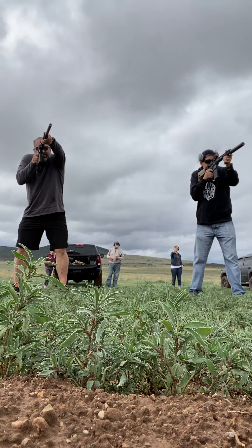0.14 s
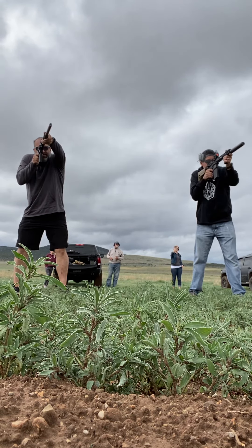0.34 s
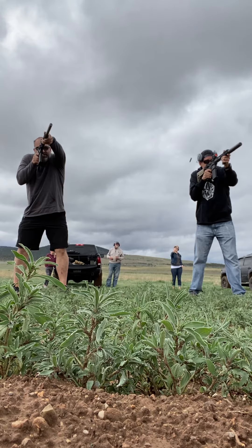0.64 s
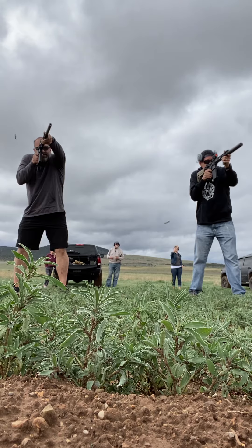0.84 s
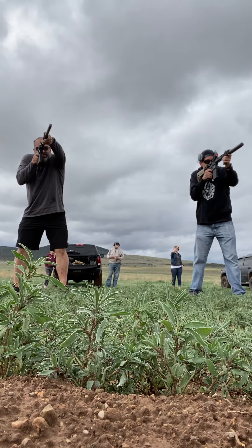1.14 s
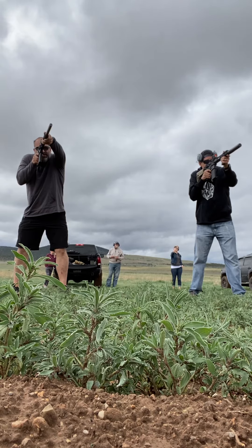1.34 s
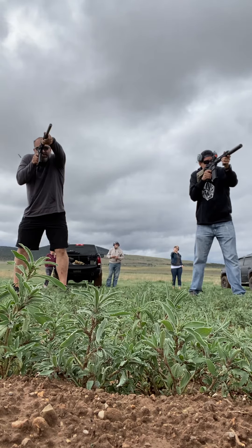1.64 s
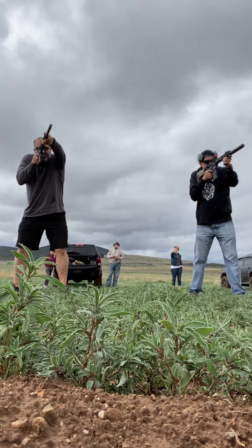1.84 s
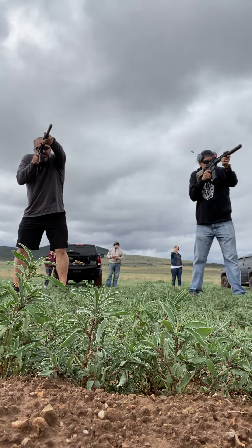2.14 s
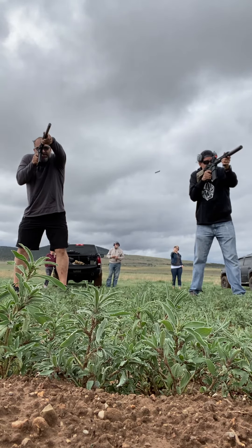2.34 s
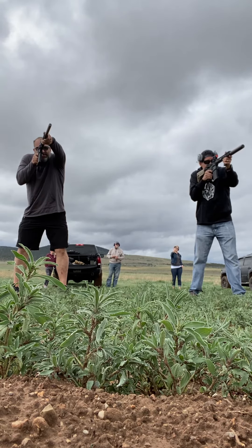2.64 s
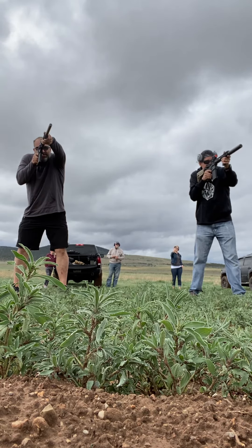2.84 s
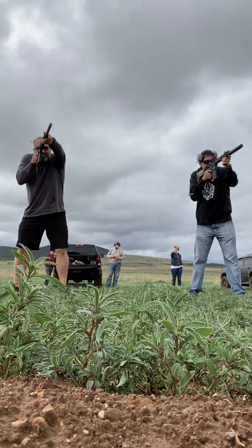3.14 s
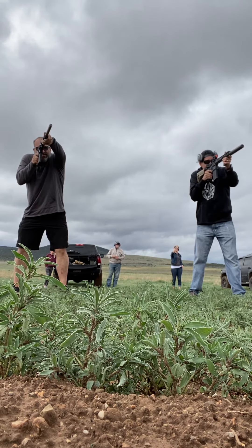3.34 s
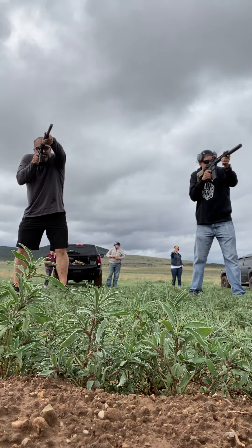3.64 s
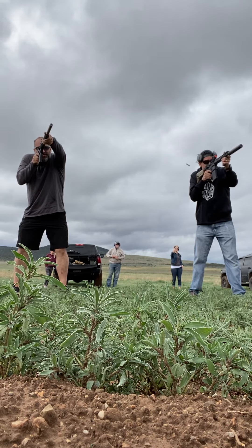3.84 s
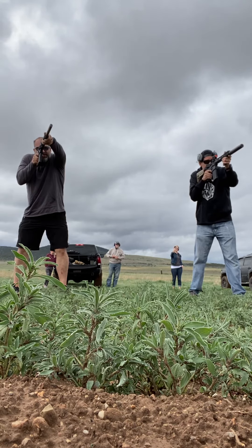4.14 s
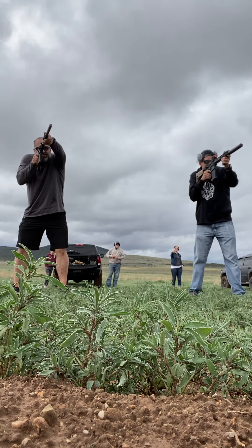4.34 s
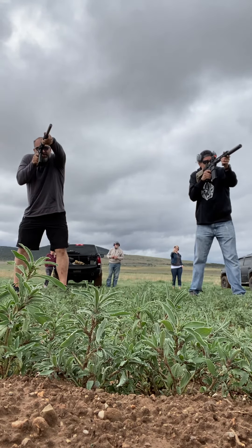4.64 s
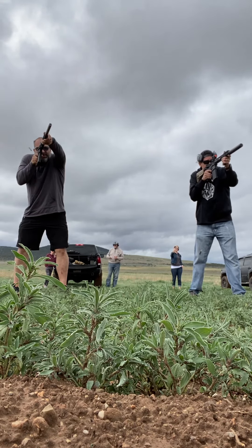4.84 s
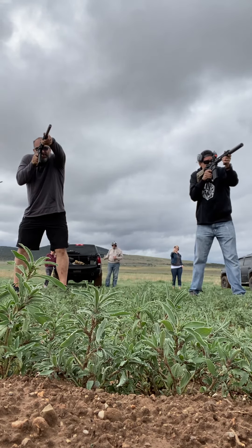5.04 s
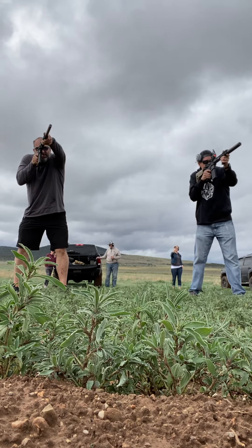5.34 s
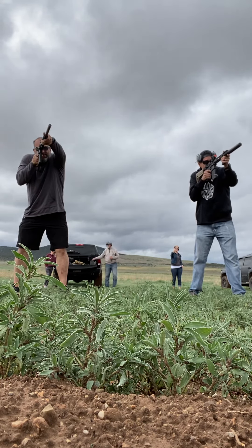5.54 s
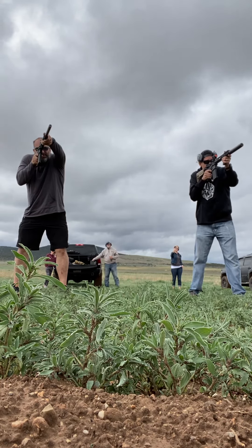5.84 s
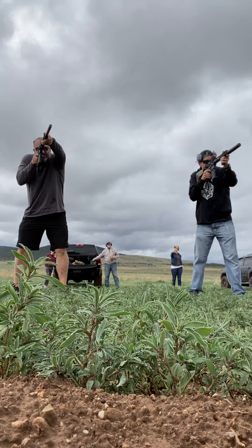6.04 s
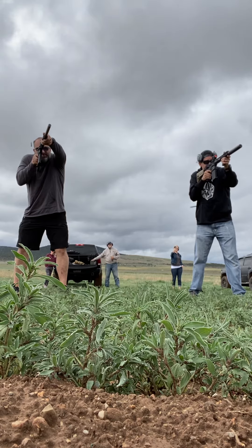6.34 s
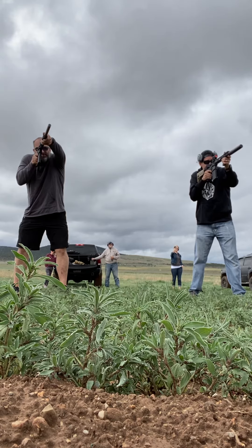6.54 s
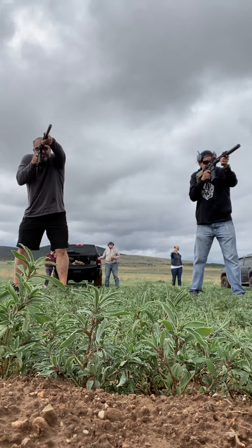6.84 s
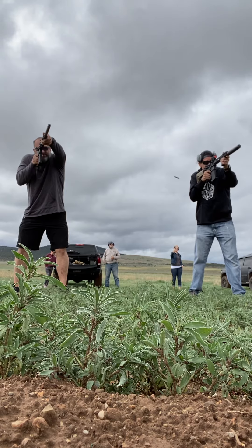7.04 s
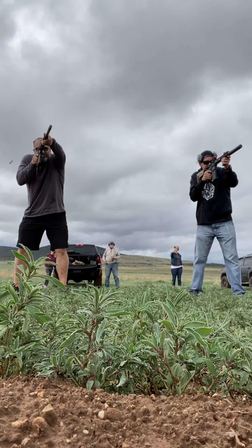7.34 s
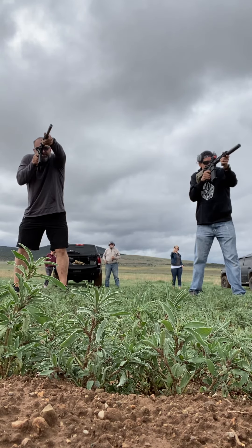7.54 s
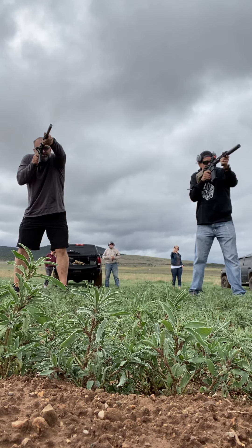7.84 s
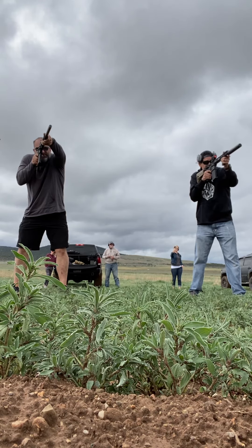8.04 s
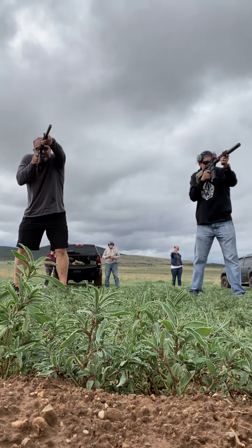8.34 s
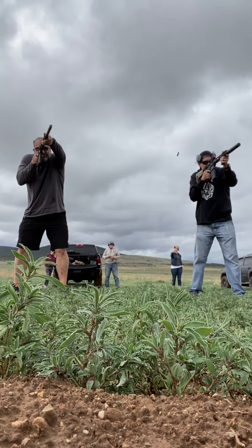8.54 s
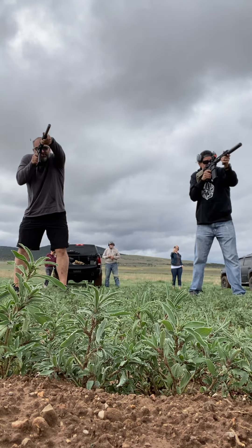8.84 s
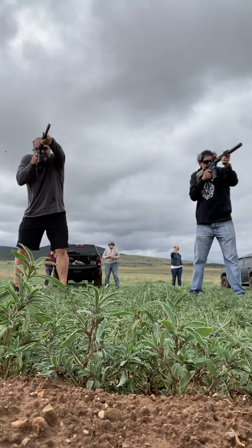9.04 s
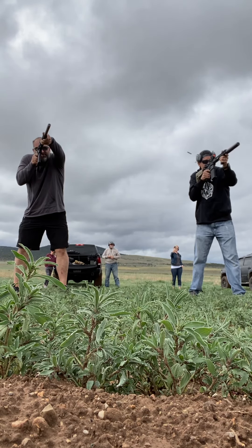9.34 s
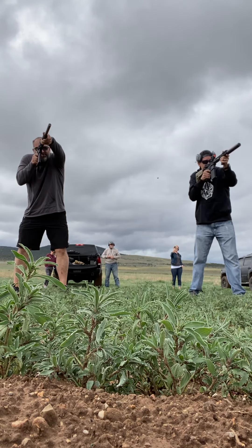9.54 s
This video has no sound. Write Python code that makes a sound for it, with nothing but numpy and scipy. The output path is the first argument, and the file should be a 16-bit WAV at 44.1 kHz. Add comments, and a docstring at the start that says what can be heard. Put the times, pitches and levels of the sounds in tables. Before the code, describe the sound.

A continuous run of about twenty-five suppressed single rifle shots over open ground, close and peak-rounded. The first blast is already sounding at the start. Blasts are dry, puffy and very short, with a low push and rustling scatter from weeds, then a bolt clack. Echoes vary from bright hard slaps to dull, weaker ones. High brass tones shimmer between some shots, and faint wind-like air remains as the last report fades.

```python
"""A short, overloaded blast comes first: two suppressed rifles fire single shots in an open field.
The microphone lies close by among weeds. Each shot is about 15 ms of shaped noise with a low push,
then a bolt clack and low whoops that fall in pitch. Slaps and a wash of scattered echoes follow;
the earliest slaps are the brightest. A roll and thin hiss die away over faint moving air.
Ejected brass cases ring as sums of fading sine tones."""
import sys
import numpy as np
from scipy import signal
from scipy.fft import rfft, irfft, next_fast_len
from scipy.io import wavfile
from scipy.ndimage import map_coordinates

SR = 44100
rng = np.random.default_rng(int(sys.argv[2]) if len(sys.argv) > 2 else 0)


def wrap_up_sound(samples):
    """Save the sound to the file named by the first command line argument, as 16-bit audio."""
    columns = np.atleast_2d(samples).T
    # keep every value between -1 and 1, then stretch to whole-number steps
    tamed = np.clip(columns, -1, 1)
    steps = np.round(tamed * 32767).astype(np.int16)
    wavfile.write(sys.argv[1], SR, steps)


N = 427329

# One row per shot:
# (time [s], body level [dB], body centre [Hz], bolt level [dB], whoop level [dB], far whoop delay [s],
#  first slap delay [s], slap level [dB], wash level [dB], late hiss level [dB])
SHOTS = [(-.054, -17.5, 641, -42, -18.5, 0.18, 0.088, -24.5, -45, -66),
         (.3328, -16.5, 604, -38.5, -20.5, .207, 0.088, -14, -43.5, -72.5),
         (0.7386, -16.5, 800, -44.5, -19, 0.21, 0.087, -20.5, -44, -71.5),
         (1.1703, -18.5, 635, -37, -17.5, 0.21, 0.089, -13, -43.5, -70.5),
         (1.486, -11.5, 637, -43, -17, .188, 0.087, -20, -42, -68),
         (1.9694, -15, 720, -34, -17, .124, 0.096, -36, -57, -74),
         (2.297, -15, 597, -45, -20.5, .168, 0.092, -36, -49.5, -66.5),
         (2.7259, -15.5, 780, -35, -31, 0.14, 0.096, -37, -59, -62.5),
         (3.0593, -16.5, 615, -40.5, -17, 0.15, 0.14, -33.5, -56.5, -58.5),
         (3.5005, -16, 519, -38, -29, 0.18, 0.092, -22, -48.5, -71),
         (3.9063, -16, 762, -43.5, -21, 0.19, 0.088, -16.5, -44.5, -73.5),
         (4.2952, -16.5, 705, -35.5, -15.5, 0.2, 0.09, -8.5, -43, -79),
         (4.764, -13, 810, -43.5, -17, 0.16, .130, -30, -55.5, -67.5),
         (5.1457, -16, 871, -36, -30.5, .102, .150, -39.5, -61, -65),
         (5.5224, -17.5, 698, -46.5, -23.5, 0.19, .0916, -25.5, -44.5, -66.5),
         (5.882, -20, 661, -37.5, -18, .196, 0.088, -10, -41.5, -73),
         (6.2974, -13, 665, -43.5, -18, .166, .0904, -61, -54, -69.5),
         (6.6528, -17, 696, -37.5, -20.5, 0.19, .0888, -14.5, -45, -74),
         (7.0124, -13, 724, -46.5, -19, 0.13, 0.12, -25.5, -55.5, -64),
         (7.4355, -16, 570, -37.5, -42.5, 0.18, .0883, -22.5, -54, -67.5),
         (7.8473, -14.5, 773, -42, -17, 0.16, .130, -34, -56.5, -60),
         (8.2376, -19, 570, -35, -16, 0.15, 0.11, -43, -54.5, -60.5),
         (8.7243, -14.5, 740, -41.5, -17.5, 0.14, 0.14, -36, -55.5, -71),
         (9.1615, -16.5, 541, -35.5, -26, 0.11, 0.17, -40.5, -64, -72),
         (9.616, -15.5, 690, -45, -20.5, .16, .13, -34, -55, -60)]
# The hollow body of a blast: (multiple of its centre frequency [ratio], relative level [dB])
BODY = [(.1, -24), (.28, 2.5), (.42, -6), (.65, 0), (1.2, 0), (1.75, -14.5), (7, -50)]
# Reflectors that make up an echo; the levels are relative, and a late slap stretches the crest:
# (delay after the first slap [s], slap level [dB], crack level [dB], sweep [ratio], crest time [s])
REFLECTORS = [(0, 2, 1, 0.86, 0.00084), (0.022, -6, -1.5, 0.54, 0.002), (0.054, -19.5, -11.5, 0.486, 0.003),
              (0.079, -15.5, -10.5, 0.61, 0.0033)]
# Crack and sweep of an echo by its delay, for a slap of usual level: brightest when early,
# dullest near 0.13 s, then a little brighter:
# (slap delay [s], crack level [dB], sweep [cycles squared per s])
ECHO_BRIGHTNESS = [(0.092, -32.5, 6530), (0.099, -53.5, 4550), (.13, -56, 2100), (.16, -51, 3340)]
# Cases ringing as they spin through the air: (time [s], level [dB], tilt [dB per octave])
SPINS = [(.445, -39, -2.5), (1.285, -44.5, 0), (3.69, -56.5, 2), (4.44, -45.5, -7), (5.995, -42.5, 1.5),
         (6.766, -42.5, 2), (7.524, -42, -13.5)]
# Tones of a spinning case, before their pitch creeps up:
# (frequency [Hz], relative level [dB], time to fade by 60 dB [s])
CASE = [(7260, -13, .22), (7860, -15, .4), (8280, -2, .52), (12280, -6, .62), (12860, -13, .22),
        (13780, -13, .26)]
# Cases striking stones and one another:
# (time [s], level [dB], pitch favoured by the point of contact [Hz])
LANDINGS = [(.036, -44.5, 10990), (.983, -55.5, 10740), (1.812, -56.5, 15200), (1.813, -63.5, 10990),
            (2.44, -51.5, 5290), (4.08, -53.5, 5270), (4.084, -56.5, 7070), (5.61, -53.5, 7070),
            (5.691, -55.5, 5270), (6.393, -49, 5270), (6.47, -53.5, 5270), (7.281, -56, 15200),
            (9.31, -63, 3210)]
# Tones of a struck case: (frequency [Hz], relative level [dB], time to fade by 60 dB [s])
STRUCK_CASE = [(3210, 0, .6), (5280, 0, .17), (7070, 0, .33), (9430, -4, .3), (10990, 0, .33),
               (12420, -6, .2), (13700, -4, .16), (15150, -1, .22)]

# Tone colours of the noises: (frequency [Hz], relative level [dB])
BLAST_COLOUR = [(60, -24.5), (400, -9), (1100, 1.5), (2100, -2.5), (3300, .5), (5200, -2.5), (7300, -1),
                (8800, -8.5), (12500, -7), (15800, -12.5)]
WEEDS_COLOUR = [(150, -20), (500, 2), (1000, -5), (2200, -0.5), (3400, -0.5), (5200, -7.5), (9000, -10.5),
                (15800, -13)]
BOLT_COLOUR = [(800, -23), (2000, -4.5), (3600, 1), (5500, -1.5), (7500, 1), (11000, -4), (15800, -8.5)]
CRACK_COLOUR = [(300, -18), (1500, 8.5), (2500, -2.5), (4000, -1), (8000, -2.5), (15800, -10.5)]
WASH_COLOUR = [(60, -27), (200, 2.5), (450, 2), (800, 4), (1400, -2), (2300, -14), (4000, -19), (7500, -14),
               (11000, -20.5), (15800, -26)]
ROLL_COLOUR = [(30, -36), (100, -13), (330, 0), (650, 1), (1200, -8), (2500, -21.5), (7000, -25.5),
               (15800, -36)]
HISS_COLOUR = [(600, -9.5), (1500, 7), (3000, -4.5), (5000, 0.5), (7500, -4.5), (10000, -13.5),
               (15800, -21.5)]
AIR_COLOUR = [(25, -29.5), (100, -6.5), (450, 3), (800, -3), (1500, -16), (3000, -19), (8000, -23.5),
              (15800, -31)]

# How each noise swells and fades after its onset: (time [s], relative level [dB])
BLAST_SHAPE = [(0, 1), (.003, 0.5), (.008, -0.5), (0.0116, -1.5), (0.015, -10.5), (.019, -23), (.03, -58)]
BODY_SHAPE = [(0, -1), (.003, 4), (.012, -1), (0.015, -3.5), (.02, -20.5), (0.034, -61)]
WEEDS_SHAPE = [(0, -14), (.015, -4.5), (0.025, -4.5), (0.046, -13), (.08, -25), (.15, -25.5), (0.301, -72)]
WASH_SHAPE = [(0, -18), (.008, 0.5), (0.034, 0), (0.064, -1.5), (.085, 1), (.11, 0.5), (.132, -2),
              (0.152, -15.5), (.3, -46.5)]
ROLL_SHAPE = [(0, -17.5), (.05, 1), (0.181, -6.5), (0.262, -3), (0.399, -14.5), (.8, -39)]
HISS_SHAPE = [(0, -11.5), (.06, 3), (.17, 6.5), (0.261, 2), (0.359, -2.5), (0.498, -15.5), (0.799, -44.5)]

TOP_HZ = 15900  # the microphone's low-pass filter cuts off here
LEAD = SR // 4  # samples of room for sounds that begin just before time zero
T = np.arange(SR) / SR  # time since an onset, one second long

BLAST_DB, PUSH_DB = -11, -22  # jet and low push of a shot with the usual body level
USUAL_BODY_DB = -15
PUSH_FOLLOWS = 0.33  # dB of push gained for each dB more of body
HOLLOW_TRADE = 0.2  # dB of sharp jet lost for each dB more of hollow body
BOLT_S, BOLT_RING_DB = .055, -4.5  # bolt delay after the blast; its ring relative to its clack
WHOOP_GAP_S, WHOOP_LOSS_DB = .0435, 15  # spacing of the whoops; each is this much weaker than the last
FAR_WHOOP_DB = -33  # level of the far whoop if the near one is at 0 dB
FAR_WHOOP_FOLLOWS = .4  # dB of far whoop for each dB of near whoop
USUAL_SLAP_DB, CRACK_FOLLOWS = -21, 0.13  # usual slap; dB of crack for each dB more of slap
THUMP_DB = -12.5  # low tail of the first slap, relative to the slap
NEAR_WAY_S, SPREAD_POWER = 0.092, 1.25  # later slaps are stretched by this power of relative delay
FADE_DB_PER_S = 90  # loss of the slaps behind the first, per second of extra delay
SWEEP_OCTAVES_PER_DB = -0.02  # a stronger slap sweeps lower
TURNS_PER_S, TURN_DEPTH = 24, 0.44  # a case tumbles end over end and is loudest broadside on
CONTACT_FALL_DB = 27  # loss per octave away from the pitch favoured by the contact


def amp(db):
    """Turn decibels into a multiplier."""
    return 10 ** (np.asarray(db) / 20)


def add(track, s, sound):
    """Mix a sound into a track, starting at time s in seconds."""
    start = LEAD + round(s * SR)
    track[start:start + len(sound)] += sound


def silence():
    """Make an empty track with a margin at both ends."""
    return np.zeros(LEAD + N + 2 * SR)


def noise(colour, size=SR):
    """Filter random noise to a tone colour, with an average (rms) strength of 1."""
    table_hz, table_db = np.transpose(colour)
    hz = np.fft.rfftfreq(size, 1 / SR)
    # Pitch is heard in octaves, so read the table on a log scale; + 1 avoids the log of zero.
    db = np.interp(np.log(hz + 1), np.log(table_hz), table_db)
    gain = amp(db) * (hz < 16600)
    coloured = irfft(rfft(rng.standard_normal(size)) * gain, size)
    return coloured / coloured.std()


def level_curve(shape):
    """Draw a multiplier over time through the dB points of a shape, nearly silent after the last."""
    s, db = np.transpose(shape)
    return amp(np.interp(T, s, db, right=-120))


def burst(colour, shape):
    """Make coloured noise swell and fade."""
    return noise(colour) * level_curve(shape)


def steady_burst(colour, shape):
    """Make a very short burst, scaled so that every random draw carries the same energy."""
    level = level_curve(shape)
    sound = noise(colour) * level
    return sound * np.linalg.norm(level) / np.linalg.norm(sound)


def pressure_pulse(sweep, crest_s):
    """A pulse whose highs come first, so its pitch falls as one over the root of time."""
    u = T / crest_s
    swell = u ** 2 * np.exp(2 * (1 - u))  # greatest at crest_s
    return -np.cos(2 * np.pi * np.sqrt(sweep * T)) * swell


def ring(hz, t60):
    """One struck tone that fades by 60 dB in t60 seconds."""
    return np.sin(2 * np.pi * hz * T) * np.exp(-np.log(1000) * T / t60)


def wobble(rate):
    """A smooth random curve through rate random points a second."""
    coarse = T[::16]
    points = rng.standard_normal(int(rate) + 4)
    return np.interp(T, coarse, map_coordinates(points, [coarse * rate]))


def clumps(depth_db, rate):
    """A lumpy multiplier of rms 1: many small reflections arriving in bunches."""
    gain = amp(depth_db * wobble(rate))
    return gain / np.sqrt(np.mean(gain ** 2))


def patter(rate, sweep):
    """Small falling-pitch echoes at random times, rate a second on average, with rms 1."""
    arrivals = rng.standard_normal(SR) * (rng.random(SR) < rate / SR)
    echo = pressure_pulse(sweep, crest_s=0.0022)
    pattering = signal.fftconvolve(arrivals, echo)[:SR]
    return pattering / pattering.std()


def rifles():
    """Gas jets from the suppressor with a low push, the weeds scatter it, and the bolt slams home."""
    out = silence()
    for s, body_db, body_hz, bolt_db, *_ in SHOTS:
        extra_body_db = body_db - USUAL_BODY_DB
        jet = steady_burst(BLAST_COLOUR, BLAST_SHAPE)
        add(out, s, amp(BLAST_DB - HOLLOW_TRADE * extra_body_db) * jet)

        body_colour = sorted((ratio * body_hz, level) for ratio, level in BODY)
        add(out, s, amp(body_db) * steady_burst(body_colour, BODY_SHAPE))

        push = pressure_pulse(sweep=800 * rng.uniform(.93, 1.07), crest_s=0.0135)
        add(out, s, amp(PUSH_DB + PUSH_FOLLOWS * extra_body_db) * push)

        weeds = burst(WEEDS_COLOUR, WEEDS_SHAPE) * clumps(depth_db=3, rate=370)
        add(out, s, amp(-31.0) * weeds)

        clack = burst(BOLT_COLOUR, [(0, -15.5), (.004, 0), (.007, -1), (.012, -12.5), (.04, -39)])
        add(out, s + BOLT_S, amp(bolt_db) * clack)
        add(out, s + BOLT_S + .004, amp(bolt_db + BOLT_RING_DB) * ring(hz=10000, t60=.08))
    return out


def field():
    """Each report rolls away over the open ground, with a thin hiss, above faint moving air."""
    out = silence()
    for s, *_, hiss_db in SHOTS:
        add(out, s, amp(-59.5) * burst(ROLL_COLOUR, ROLL_SHAPE))
        add(out, s, amp(hiss_db) * burst(HISS_COLOUR, HISS_SHAPE))
    add(out, 0, amp(-69.5) * noise(AIR_COLOUR, size=next_fast_len(N)))
    return out


def whoops():
    """Low falling pulses trail each blast: a fading, evenly spaced train of three and a faint far one."""
    out = silence()
    pulse = pressure_pulse(sweep=410, crest_s=0.011)
    for s, _, _, _, whoop_db, far_s, *_ in SHOTS:
        for k in range(3):
            add(out, s + (k + 1) * WHOOP_GAP_S, amp(whoop_db - k * WHOOP_LOSS_DB) * pulse)
        add(out, s + far_s, amp(FAR_WHOOP_DB + FAR_WHOOP_FOLLOWS * whoop_db) * pulse)
    return out


def echoes():
    """A few hard reflectors slap back over the grass, inside a wash of small echoes."""
    out = silence()
    swell = level_curve(WASH_SHAPE)
    ways, cracks, sweeps = np.transpose(ECHO_BRIGHTNESS)
    for s, *_, way_s, slap_db, wash_db, _ in SHOTS:
        extra_slap_db = slap_db - USUAL_SLAP_DB
        sweep = np.interp(way_s, ways, sweeps) * 2 ** (SWEEP_OCTAVES_PER_DB * extra_slap_db)
        crack_db = np.interp(way_s, ways, cracks) + CRACK_FOLLOWS * extra_slap_db
        stretch = (way_s / NEAR_WAY_S) ** SPREAD_POWER

        for k, (delay, db, bright_db, ratio, crest_s) in enumerate(REFLECTORS):
            fade_db = FADE_DB_PER_S * (way_s - NEAR_WAY_S) * (k > 0)  # spares the first slap
            slap = pressure_pulse(sweep * ratio, crest_s * stretch)
            slap = slap * clumps(depth_db=4, rate=1160)
            add(out, s + way_s + delay - .0005, amp(slap_db + db - fade_db) * slap)
            crack = burst(CRACK_COLOUR, [(0, 1.5), (.003, -5), (.008, -11.5), (.04, -36)])
            add(out, s + way_s + delay, amp(crack_db + bright_db) * crack)

        thump = pressure_pulse(sweep=490, crest_s=0.0035)
        add(out, s + way_s, amp(slap_db + THUMP_DB) * thump)

        lumpy_noise = noise(WASH_COLOUR) * clumps(depth_db=3.5, rate=200)
        wash = lumpy_noise + amp(-3.0) * patter(rate=200, sweep=2500)
        add(out, s + .088, amp(wash_db) * swell * wash)  # the nearest scatterers stand about 15 m away
    return out


def brass():
    """Spinning cases ring with a flutter, and some ping as they land and tumble."""
    out = silence()
    for s, db, tilt_db in SPINS:
        doppler = 1 + 0.019 * np.minimum(T, .5)  # the arc of flight bends towards the microphone
        for hz, tone_db, t60 in CASE:
            # Two loud moments a turn; each tone points its own way as the case turns.
            turn = 1 + TURN_DEPTH * np.cos(2 * np.pi * (2 * TURNS_PER_S * T + rng.random()))
            flutter = turn * amp(2.5 * wobble(rate=45))
            tilted_db = db + tone_db + tilt_db * np.log2(hz / 10000)
            add(out, s, amp(tilted_db) * flutter * ring(hz * doppler, t60))

    tick_colour = [(3000, -33.5), (10000, -9.5), (15000, -3)]
    for s, db, contact_hz in LANDINGS:
        tick = burst(tick_colour, [(0, -2), (.004, -17), (.03, -47.5)])
        add(out, s, amp(db - 4) * tick)
        for hz, tone_db, t60 in STRUCK_CASE:
            tumble = amp(3.8 * wobble(rate=70))
            octaves_away = abs(np.log2(hz / contact_hz))
            add(out, s, amp(db + tone_db - CONTACT_FALL_DB * octaves_away) * tumble * ring(hz, t60))
    return out


def scene():
    """Add up everything that reaches the microphone, as one channel."""
    everything = rifles() + field() + whoops() + echoes() + brass()
    return everything[None, LEAD:LEAD + N]


def record(dry):
    """The microphone rounds off the peaks; its filter smears each blast slightly ahead in time."""
    loud = dry / (1 + np.abs(dry / .8) ** 6) ** (1 / 6)  # peaks bend over towards 0.8

    count = round(.021 * SR)
    colour = [(80, -19), (400, 4.5), (800, -3.5), (2000, -8.5), (3200, -7.0), (7500, -9.5), (9500, -14.5)]
    smear = noise(colour)[:count] * amp(np.linspace(-27, 0, count))  # grows towards the blast
    smear = smear / np.linalg.norm(smear)
    # Dropping the first samples moves the smear ahead of the sound that makes it.
    ahead = signal.fftconvolve(loud, smear[None], axes=1)[:, count - 1:]
    mixed = loud + amp(-23.5) * ahead

    low_pass = signal.firwin(151, TOP_HZ, fs=SR)
    return signal.fftconvolve(mixed, low_pass[None], mode="same", axes=1)


dry = scene()
out = record(dry)
wrap_up_sound(out)
```